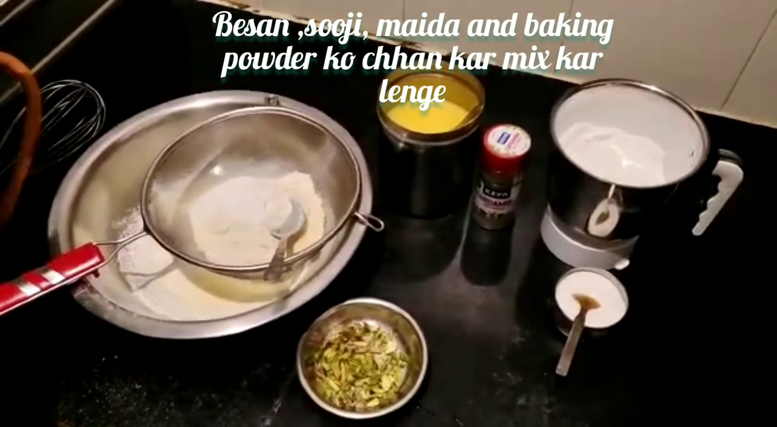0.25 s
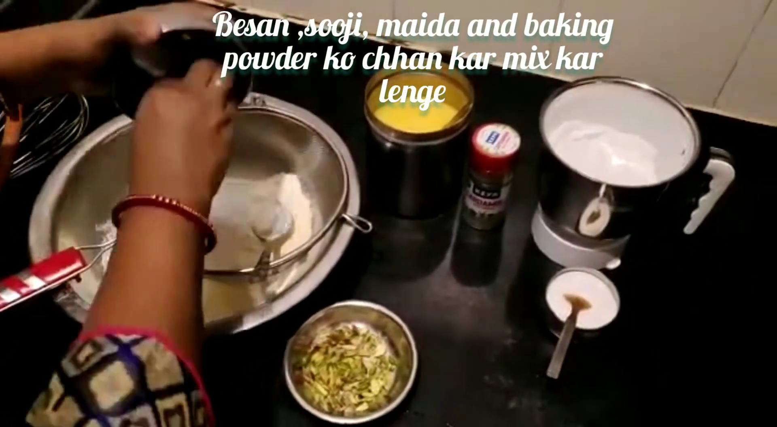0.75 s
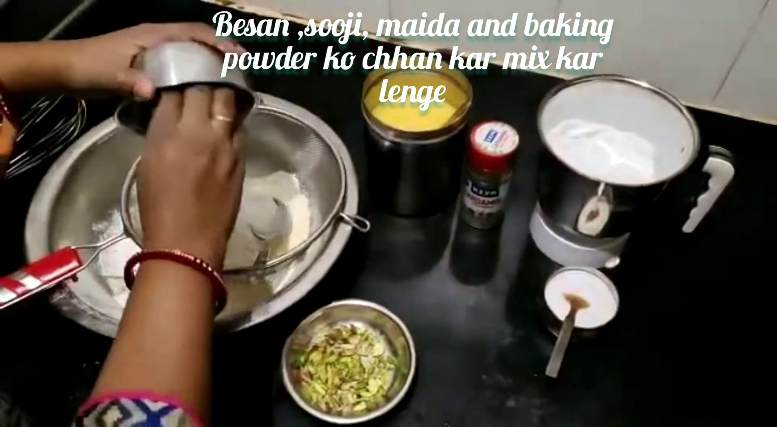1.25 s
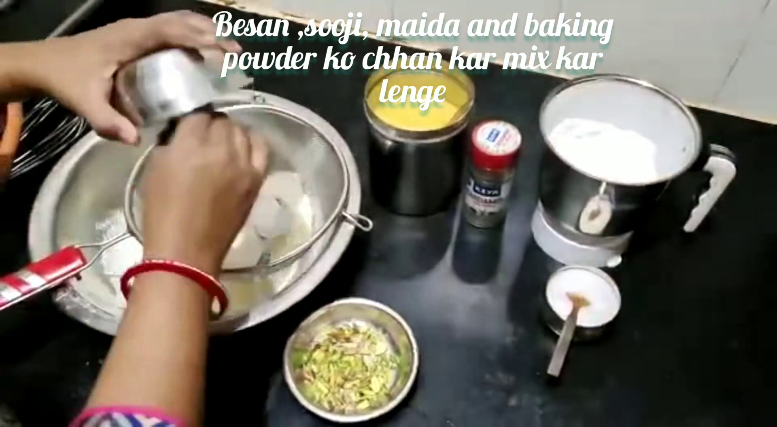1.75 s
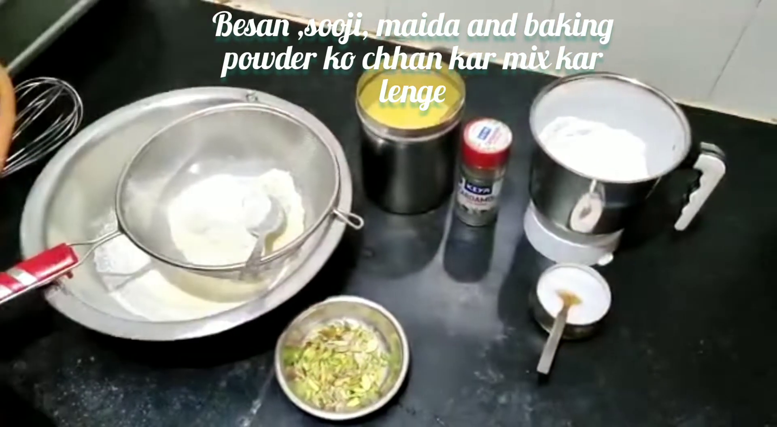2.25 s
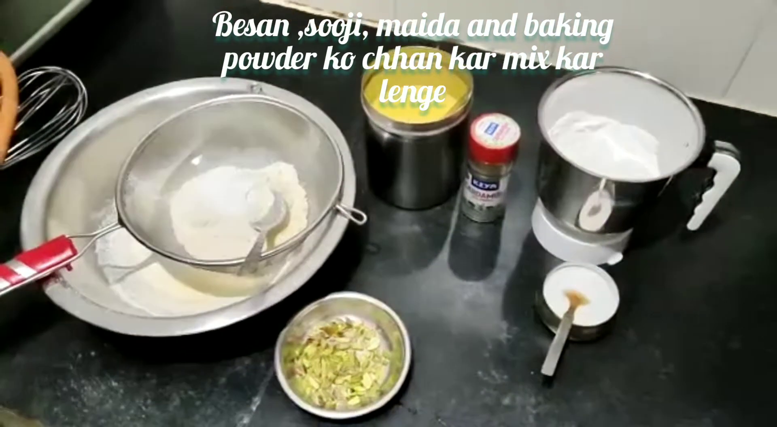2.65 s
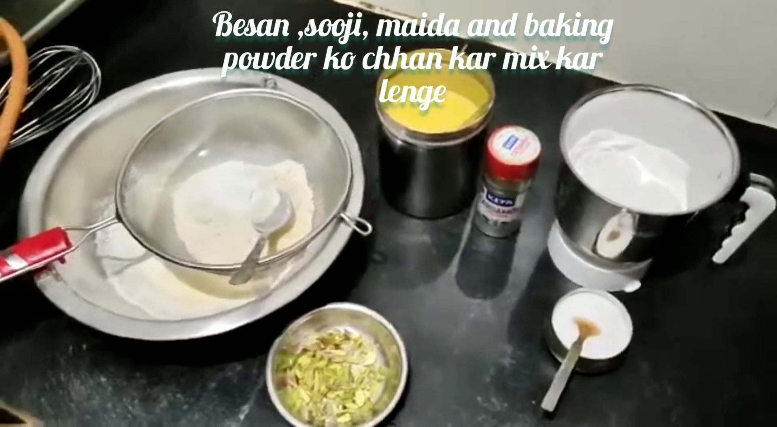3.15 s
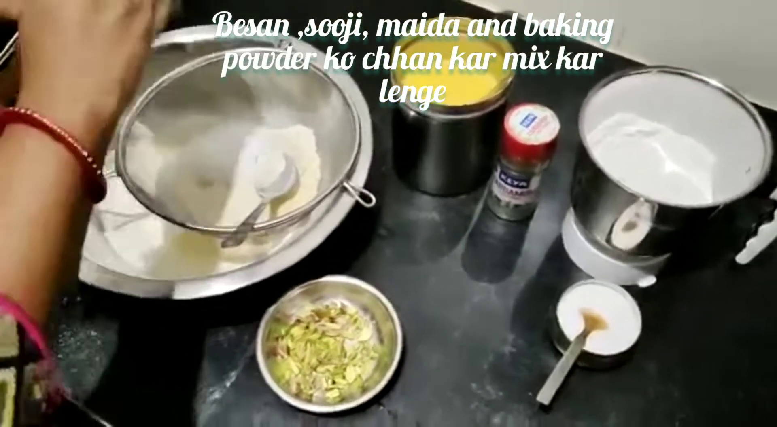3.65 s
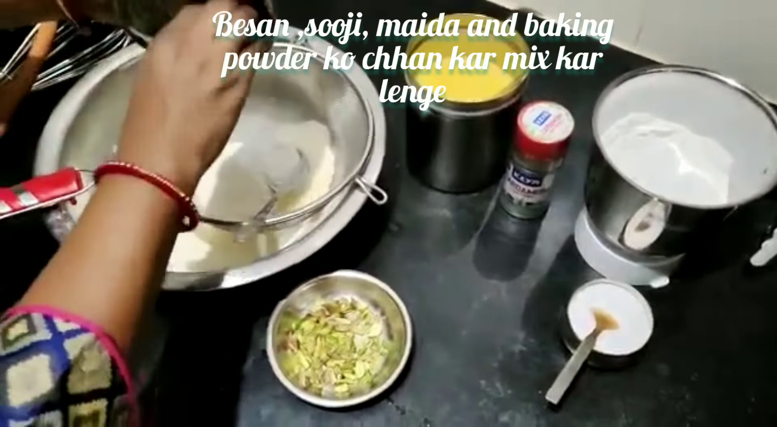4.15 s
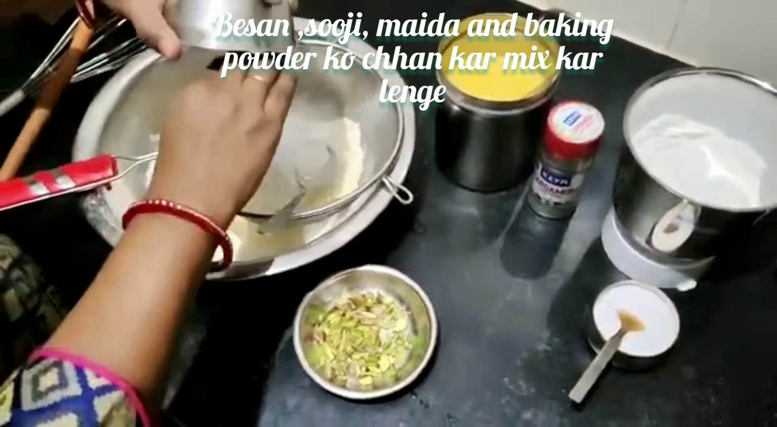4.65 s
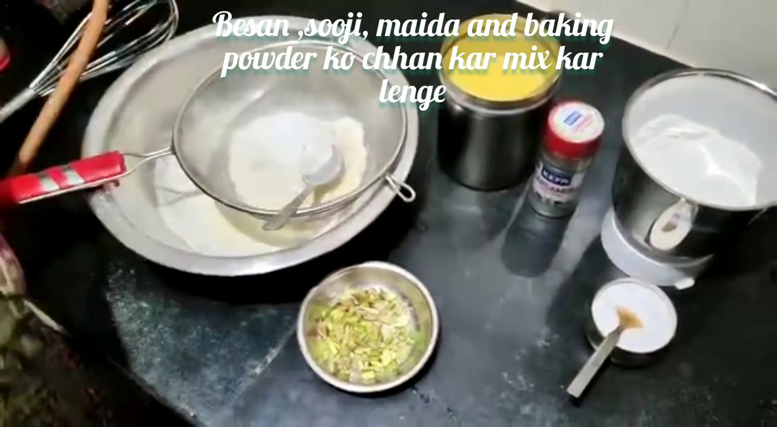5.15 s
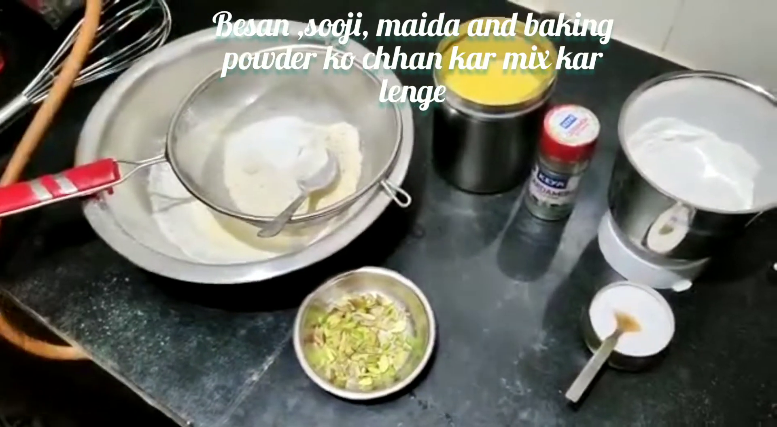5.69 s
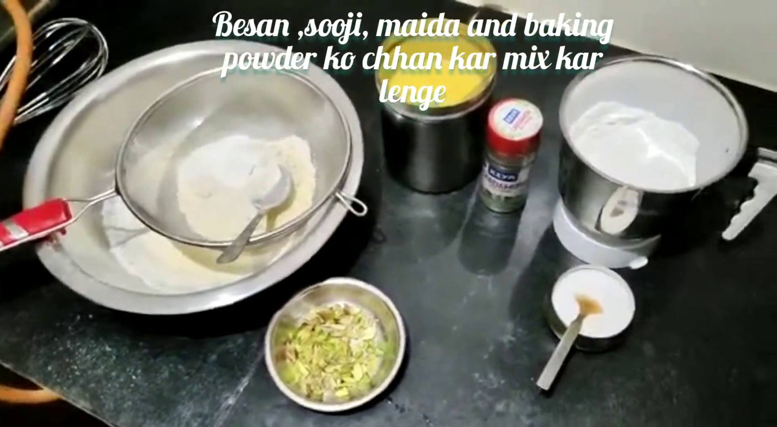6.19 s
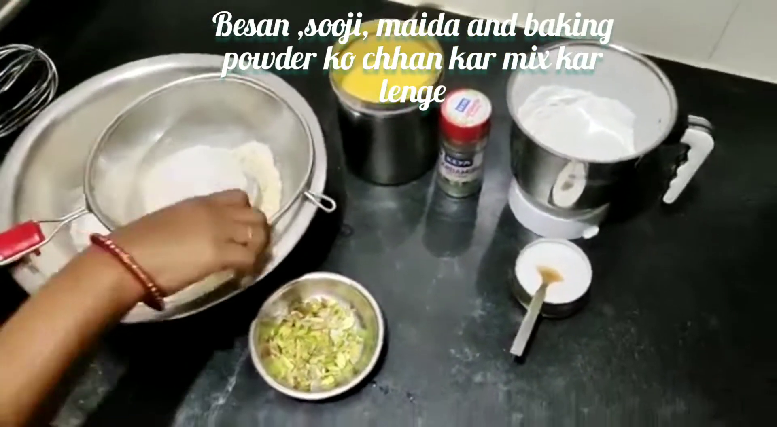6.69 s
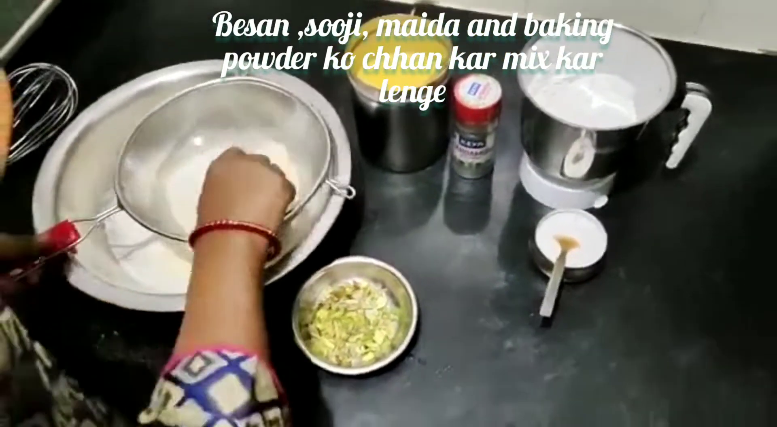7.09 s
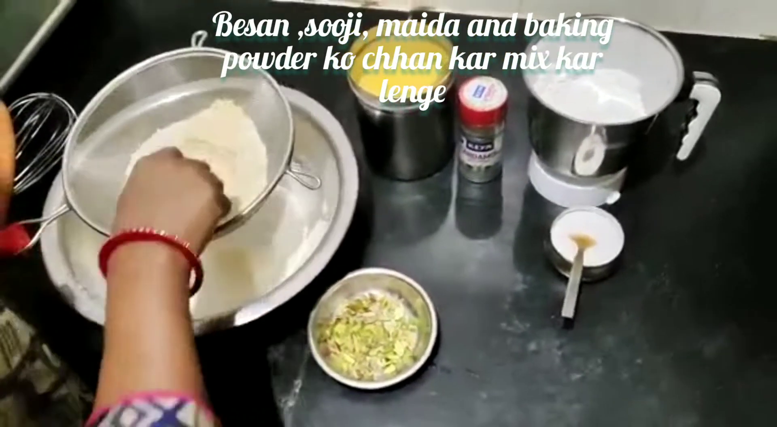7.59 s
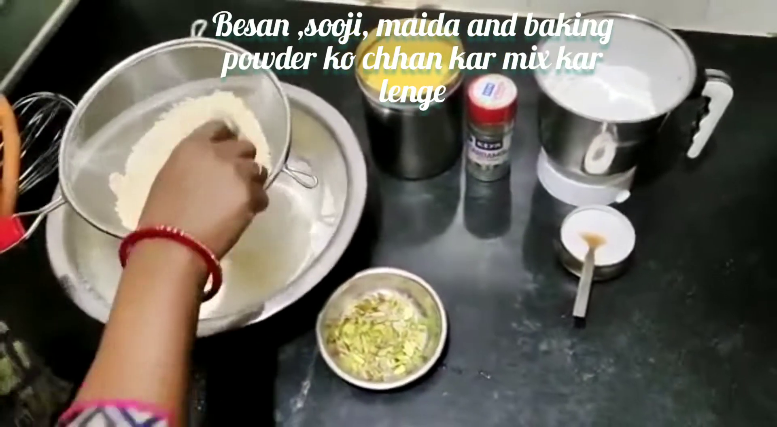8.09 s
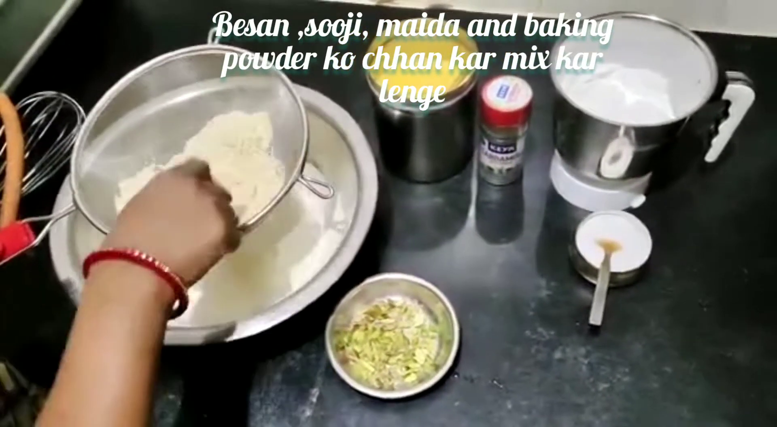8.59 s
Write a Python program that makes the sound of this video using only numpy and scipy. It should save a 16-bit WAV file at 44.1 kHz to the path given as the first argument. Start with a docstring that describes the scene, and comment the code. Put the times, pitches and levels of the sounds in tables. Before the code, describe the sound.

Light metal clinks and scrapes, two ringing clatters of steel cups, then short hissing spoon strokes on wire mesh, with a faint electrical hum.

```python
"""Light steel taps and scrapes over a mains hum: in a kitchen, two small cups are scraped empty over a
sieve and put down with a clatter. Knocks and tiny slips ring the cups' modes, and the hand damps them.
Then a spoon pushes flour through the steel mesh in short strokes that hiss and make the wires sing.
The sound is close, with the stereo image widened in the middle range."""
import sys
import numpy as np
from scipy import signal
from scipy.fft import rfft, irfft, next_fast_len
from scipy.io import wavfile
from scipy.ndimage import uniform_filter1d

SR = 44100
rng = np.random.default_rng(int(sys.argv[2]) if len(sys.argv) > 2 else 0)


def output_pcm(signal):
    """Save a mono or channel-first signal as 16-bit PCM at the path in sys.argv[1].

    Samples are clipped to [-1, 1] before scaling.
    """
    pcm = np.clip(np.atleast_2d(signal).T, -1, 1) * 32767
    wavfile.write(sys.argv[1], SR, np.round(pcm).astype(np.int16))


N = 389403
T = np.arange(N) / SR

# ringing modes of each steel cup: pitch_hz, level_db, t60_s
FIRST_CUP = [(852, -21, 0.29), (1042, -20, 0.81), (1075.4, -1, 0.29), (1202.6, -11.5, 0.18),
             (1612, -3.5, 0.091), (1787, -19, 0.18), (1900, -12, 0.23), (2080, 6.5, 0.24), (2044, -6, 0.51),
             (2434, 2, .2), (4130, -4, 0.11), (5345, -0.5, 0.1), (6460, -3.5, 0.13), (6593, -6.5, 0.14),
             (6940, 0, 0.067), (8680, -16, 0.1), (9330, -22.5, 0.22), (11390, -23, 0.06)]
SECOND_CUP = [(1032, -11, 0.26), (1088, -6, 0.31), (1158, -10.5, 0.42), (1242, 3.5, 0.5), (1323, 3.5, 0.43),
              (1407, -6.5, 0.25), (1705, -17, 0.15), (1750, -11, 0.12), (2190, -9, 0.7), (2261, -1.5, 0.6),
              (2345, 4.5, 0.35), (2262, 4, 0.25), (3620, -9, 0.25), (3910, -10, 0.2), (3990, -5, 0.088),
              (4935, -7, 0.089), (5010, -12.5, 0.16), (5895, -10.5, 0.16), (7340, -9, 0.41)]


def amp(db):
    """Gain of a level in dB."""
    return 10 ** (np.asarray(db) / 20)


def unit_rms(x):
    """Each row at rms 1."""
    return x / np.sqrt(np.mean(x ** 2, -1, keepdims=True) + 1e-20)


def unit_peak(x):
    """Each row at peak 1."""
    return x / abs(x).max(-1, keepdims=True)


def add(mix, start_s, sound):
    """Mixes a sound in at start_s."""
    part = mix[:, round(start_s * SR):][:, :sound.shape[1]]
    part += sound[:, :part.shape[1]]


def colour(x, gain_at):
    """Filters by a gain given as a function of Hz."""
    size = next_fast_len(x.shape[-1])
    return irfft(rfft(x, size) * gain_at(np.fft.rfftfreq(size, 1 / SR)), size)[..., :x.shape[-1]]


def eq(x, curve):
    """Filters by (freq_hz, gain_db) points joined on a log-frequency axis."""
    hz, db = np.transpose(curve)
    return colour(x, lambda f: amp(np.interp(np.log(f + 1), np.log(hz + 1), db)))


def band(x, lo_hz, hi_hz):
    """One steep-sided band of a sound, at rms 1."""
    return unit_rms(colour(x, lambda f: ((1 + (lo_hz / (f + 1)) ** 12) * (1 + (f / hi_hz) ** 12)) ** -.5))


def pan(x, pan_db):
    """Mid signal fed into the side channel moves a source; positive is left."""
    mid, side = x
    lean = np.tanh(pan_db / 12)
    return np.array([mid, np.sqrt(1 - lean ** 2) * side + lean * mid])


def envelopes(rows, gains):
    """Summed strokes, one envelope per column of gains; a rise or fall time spans 20 dB."""
    start, rise, hold, fall = abs(rows[:, :4].T[:, :, None]) + 1e-4
    t = T[::32]
    shape = amp(-20 * (np.maximum(start - t, 0) / rise + np.maximum(t - start - hold, 0) / fall))
    return np.array([np.interp(T, t, level) for level in gains.T @ shape])


def grit(per_s, spread_db):
    """Tiny slips of uneven size, each a noise burst, at the same moments in mid and side."""
    sizes = amp(spread_db * np.minimum(rng.exponential(1, N), 4))
    slips = sizes * (rng.random(N) < per_s / SR)
    bursts = signal.lfilter([1], [1, -np.exp(-1 / (0.0021 * SR))], slips)
    return unit_rms(bursts * rng.standard_normal((2, N)))


def patchy(x, depth_db):
    """The colour drifts in patches some 500 Hz wide and 80 ms long as the contact moves."""
    spectra = signal.stft(x, nperseg=512)[2]
    drift = uniform_filter1d(rng.standard_normal(spectra.shape[1:]), size=6, axis=0)
    drift = uniform_filter1d(drift, size=14, axis=1)
    return signal.istft(spectra * amp(depth_db * drift / drift.std()), nperseg=512)[1][:, :x.shape[1]]


def mains_hum(pitch_hz=100.1, waver_hz=0.39, air_db=-14.5):
    """A wavering hum with its harmonics, and room air that follows the same level."""
    # the hum's level, sinking after the loudest clatter: time_s, level_db
    fader = [(0.0, -26.5), (0.07, -27), (0.59, -27), (2.24, -26), (2.31, -26.5), (4.89, -25.5),
             (4.97, -24.5), (5.09, -24.5), (5.75, -24.5), (5.8, -27.5), (7.21, -29.5), (7.33, -26.5),
             (7.67, -27), (7.77, -30), (7.87, -26.5), (8.51, -28.5), (8.81, -27), (8.83, -23)]
    # overtones against the fundamental: multiple, level_db
    harmonics = [(2, -26.5), (3, -28), (4, -27)]
    # spectrum of the room air: freq_hz, level_db
    air_curve = [(12, -86), (20, -42), (42, -22), (70, -20.5), (103, -5.5), (129, -11), (157, -14.5),
                 (414, -24), (903, -34.5), (1570, -32), (2900, -45), (6870, -44.5), (7900, -51),
                 (11300, -62.5), (15400, -103)]
    waver = np.interp(T, np.arange(46) / 5, rng.standard_normal(46))
    phase = 2 * np.pi * np.cumsum(pitch_hz + waver_hz * waver) / SR
    tone = np.sin(phase) + sum(amp(db) * np.sin(k * phase + 2 * np.pi * rng.random())
                               for k, db in harmonics)
    air = unit_rms(eq(rng.standard_normal((2, N)), air_curve))
    level = amp(np.interp(T, *np.transpose(fader)))
    return level * (np.sqrt(2) * tone * [[1], [-.9]] + amp(air_db) * air * [[1], [1.3]])


def grab_damping(start_s, t, freedom):
    """Extra decay of the low and upper modes once the hand or the counter closes on a ringing cup."""
    # freedom left to ring, smaller is tighter: time_s, low_factor, upper_factor
    grabs = [(2.585, 0.21, 0.13), (2.742, 0.42, 0.12), (2.77, 0.06, 0.15), (3.51, 0.092, .3), (3.64, .1, 1),
             (3.815, .08, 2), (3.9, .1, .2), (4.02, 0.17, 0.46), (5.822, 0.28, .7), (5.897, 0.052, 0.17),
             (6.228, 0.11, 3), (5.953, 0.15, 0.16), (6.065, 0.2, 0.69), (6.27, 0.05, 0.17),
             (6.53, .4, 0.35)]
    free = freedom
    for at_s, *limits in grabs:
        caught = (start_s < at_s) & (start_s + t > at_s)
        free = np.where(caught, np.minimum(free, np.array(limits)[:, None]), free)
    return amp(-60 * np.cumsum(1 / free - 1 / freedom, 1) / SR / 0.51)


def cup_ring(t, low_hz, upper_hz, second_share, freedom, focus_db=36.5, pull=0.46):
    """Low and upper ring of a blow: modes near the two struck pitches speak most."""
    modes = np.array(FIRST_CUP + SECOND_CUP)
    share = np.where(np.arange(len(modes)) < len(FIRST_CUP), 1 - second_share, second_share)
    hz, level_db, t60 = modes.T[:, :, None]
    upper = hz[:, 0] > 2850
    near = np.exp(-(np.log(hz / low_hz) / 0.041) ** 2) + np.exp(-(np.log(hz / upper_hz) / 0.0255) ** 2)
    # the grip pulls nearby modes towards the struck pitches
    hz = hz + pull * np.minimum(near, 1) * (np.where(upper[:, None], upper_hz, low_hz) - hz)
    scatter, phase = rng.random((2, 2, len(modes), 1))
    level_db = level_db + focus_db * near + 2.8 * scatter
    struck = (np.sqrt(share)[:, None] * amp(level_db) * np.exp(2j * np.pi * phase))[..., 0]
    strength = abs(struck[0])
    heard = strength > amp(-45) * np.where(upper, strength[upper].max(), strength[~upper].max())
    age = (t / freedom)[1 * upper]  # the ring ages faster under a firm grip
    rings = np.exp(2j * np.pi * hz * t - np.log(1000) * age / t60)
    return [unit_peak((struck[:, group] @ rings[group]).imag) for group in (heard & ~upper, heard & upper)]


def cup_knocks(bounce_db=-9.5):
    """Each blow cracks, thuds and rings the cups, then chatters in three quick bounces."""
    # blows on the cups: start_s, peak_db, low_hz, upper_hz, upper_db and thud_db (against the low ring),
    # pan_db, second_cup_share, low_t60_factor, upper_t60_factor
    knocks = [(0, -43.5, 2065, 4120, -15, -30, 0, .02, 1.2, 1),
              (.262, -36, 1062, 4120, -18, -32, 13, .03, 0.71, .4),
              (0.216, -34, 1062, 7200, -10, -10, 20, 0.082, 1.2, .46),
              (.3, -30, 2184, 6800, -16, -8, -1, .07, 0.42, .44),
              (.325, -32.5, 2150, 4060, -18, -30, 3, .02, 0.7, .8),
              (.36, -29, 2080, 5360, -4, -30, 8, 0.022, 0.38, .5),
              (0.759, -27.5, 1043, 6260, 10, -30, 6, .02, 0.74, 0.76),
              (.388, -28, 1065, 6750, 6, -20, 14, .07, 0.4, 0.58),
              (.472, -38, 2280, 3570, -13, -3, 3, .5, 0.19, .4),
              (.799, -32, 2058, 7310, -10, -30, -2, .05, 0.44, .34),
              (0.915, -29.5, 1120, 6740, -10, -35, 8, 0.039, 0.26, .25),
              (.946, -28, 1103, 4190, -8, -34, 5, 0.06, 0.31, .31),
              (1.101, -20.5, 1192, 4260, -4.5, -42, 3, 0.092, 0.26, 0.31),
              (1.123, -32, 2165, 5310, -17, -40, 3, .04, 0.3, .3),
              (1.263, -25, 1078, 4020, -32, -23, 16, 0.032, 0.32, .25),
              (1.338, -31.5, 1130, 4100, 3, -35, 0, 0.034, 0.55, 0.32),
              (1.534, -31, 2106, 5320, -4, -34, 3, .03, 0.36, .2),
              (1.4, -44.5, 2410, 4120, -20, -20, -5, .03, 0.89, .3),
              (1.638, -43, 2480, 7050, -18, -4, -2, .03, .5, .18),
              (1.685, -39, 2500, 4120, -18, -20, 0, .03, .6, .3),
              (1.741, -32.5, 1110, 5080, -18, 0, 0, 0.085, 0.51, 0.14),
              (1.843, -20.5, 1350, 5360, -11, 2.5, 2, 0.35, 0.31, 0.43),
              (2.439, -25.5, 2296, 6450, -8, -3, 2, 0.33, 0.32, 0.43),
              (2.462, -17.5, 1620, 4120, -13, -21, 6, 0.91, 0.98, 0.49),
              (2.521, -4, 1715, 6290, -23.5, -36, 7, 0.66, 0.12, 0.79),
              (2.545, -13, 1712, 4062, -10, -11.5, 7, 0.5, .62, 0.55),
              (2.556, -15.5, 2290, 6300, -3, -30, -1, .7, 0.75, 0.46),
              (2.572, -16, 1980, 4050, -7, -25, -5, .3, 0.23, .4),
              (2.628, -8.5, 1420, 9400, -28, -44, 6, 0.64, 0.071, 0.94),
              (2.633, -22, 1650, 11540, -9, -40, 0, .01, 1.6, 1.3),
              (2.633, -15, 2076, 4160, -20, -39, 6, 0.013, 2.5, 1.7),
              (2.654, -17, 2074, 6720, -1.5, -38, 0, .005, 2.8, 3.3),
              (2.675, -20, 2070, 4040, -11, -38, 0, .01, 2.3, 2.8),
              (2.68, -19.5, 2062, 5390, -15, -34, -8, .01, 1.1, 1.7),
              (2.7, -20, 1370, 6900, -4, -30, -2, .3, .5, 1.2),
              (2.588, -27, 2310, 4030, -4, -30, 2, .8, 0.31, 0.73),
              (2.785, -36, 2086, 4100, -8, -30, -3, .01, .5, 0.53),
              (2.72, -25, 2050, 4141, -7, -36, 12, .01, 1.3, 1.2),
              (2.821, -32.5, 1954, 5070, 3, -28, -1, 0.031, .16, 0.52),
              (3.46, -33.5, 1108, 4650, -6, -21, 11, 0.67, 1.3, 0.7),
              (3.609, -35.5, 2200, 4130, -2, -28, 5, .8, 0.4, 1.4),
              (3.655, -38.5, 1120, 5850, -5, -30, 2, 0.89, 0.47, 0.91),
              (3.79, -27, 1155, 5660, -4, -32, 10, 0.91, 0.34, 0.73),
              (3.99, -29, 2174, 7350, 9, -30, -1, .9, 0.35, 0.07),
              (3.575, -27, 1130, 5900, -21, -30, 13, 0.33, 1, 0.71),
              (3.719, -35.5, 1114, 6890, -20, -24, 5, 0.76, 0.62, .7),
              (3.776, -28, 2267, 5040, -15, -37, 9, 0.54, 0.18, 0.35),
              (3.787, -33, 2250, 5045, 2, -37, 11, 0.99, 0.3, 2.3),
              (3.84, -38.5, 2280, 5770, -12, -37, 10, .9, 0.81, 1),
              (3.558, -34, 2280, 7340, -15, -30, 3, .9, 0.33, 0.44),
              (3.968, -27, 1140, 3700, -4, -27, 15, 0.99, 0.27, 0.12),
              (3.984, -18.5, 1295, 5110, -3, -24, 11, 0.8, 0.12, 0.25),
              (3.994, -24, 1170, 5140, 1, -20, 8, 1, 0.18, 0.49),
              (4.22, -28, 1175, 5010, -10, -16, 12, 0.44, 0.34, 2),
              (4.246, -35, 2078, 6420, 5, -23, -3, .02, 2.1, 0.9),
              (4.525, -26, 1170, 5100, -17, -20, 8, 0.77, 0.37, 0.67),
              (4.984, -33.5, 1275, 6800, -25, -20, -8, .55, 0.43, .51),
              (5.091, -35.5, 1620, 3670, -15, -4, -5, 0.45, 0.64, .51),
              (5.306, -38, 1590, 5170, -3, -7, -3, 0.59, 0.37, 0.47),
              (5.525, -39.5, 1610, 3910, -3, -9, 7, 0.49, 0.5, 0.51),
              (5.772, -4, 2464, 3670, -0.5, -52, 9, 1, 0.79, 0.39),
              (5.776, -7.5, 1264, 4860, 2, -41, 1, 0.78, 0.24, 0.46),
              (5.816, -11, 1303, 4030, -1.5, -50.5, 4, .99, 0.6, .8),
              (5.796, -6.5, 1078, 5100, -16, -44, -6, 0.89, 0.69, 0.96),
              (5.89, -3.5, 1274, 5470, -20, -42, 5, 0.74, 0.14, .38),
              (5.905, -11, 1288, 4040, -28, -44, -11, 0.91, 0.46, .38),
              (5.861, -14.5, 2320, 5000, -25, -40, -4, .99, 0.23, .4),
              (5.919, -11, 2293, 5500, -27, -32, -3, .9, 0.33, .4),
              (5.7725, -10.5, 2790, 5750, 7, -44, 6, .99, .1, 0.17),
              (5.788, -9, 2276, 3720, -1, -42, 2, 0.82, .5, .5),
              (5.778, -25, 1110, 7390, 7, -45, 1, .99, 0.28, 0.54),
              (5.998, -20, 2300, 6900, 9, -43, -1, .3, .2, 0.22),
              (6.401, -27, 2120, 4140, 0, -40, 2, .02, .4, 1.94),
              (6.002, -29, 1710, 5370, -10, -20, 1, .6, .85, .4),
              (6.046, -11, 2297, 4100, -13, -28, 3, 1, 0.42, 1.2),
              (6.035, -10, 1717, 3940, -17.5, -32, 6, .9, .9, 0.9),
              (6.012, -21, 1720, 6100, -13, -23, 12, 0.55, .98, .4),
              (6.212, -15, 1043, 4070, -24, -35, -5, 0.022, 0.33, 1.9),
              (6.186, -19.5, 1816, 4980, -8, -50, 8, 0.032, 0.6, .2),
              (6.232, -21.5, 1091, 4090, -16, -40, 3, .02, 1.1, 3),
              (6.195, -10.5, 1067, 4076, -18, -32, 6, .018, 0.49, 3.6),
              (6.287, -17, 865, 5050, -26, -24, 1, 0.046, 0.64, .3),
              (6.348, -14.5, 1103, 5070, -2, -17, 2, .3, 0.49, 0.1),
              (6.371, -16, 1910, 3225, -14, -22, 7, .05, 0.68, 0.27),
              (6.285, -14.5, 1071, 5080, -14, -6, 6, 0.23, 0.94, .15),
              (6.305, -18, 1064, 5000, -20, -12, 2, .1, 0.75, .5),
              (6.327, -13.5, 2284, 4930, -15, -1.5, 3, .46, 0.25, .6),
              (6.368, -12, 1051, 4130, -11, -4, 0, 0.26, 0.27, 1.2),
              (6.395, -26.5, 1038, 5366, -8.5, -11, 7, .035, 0.27, 3.5),
              (6.549, -34, 1593, 5030, -6, -30, 1, 0.16, 1.7, 1.1),
              (6.737, -33, 1640, 7120, 12, -10, 0, .18, 0.44, 0.36)]
    t = np.arange(SR // 5) / SR
    onset = np.minimum(t / .0006, 1)
    out = np.zeros((2, N))
    for start_s, peak_db, low_hz, upper_hz, upper_db, thud_db, pan_db, share, *t60_factors in knocks:
        freedom = np.outer(t60_factors, np.ones_like(t))
        low, high = cup_ring(t, low_hz, upper_hz, share, freedom)
        swell = np.minimum(t * low_hz / 2.5, 1)  # the low ring builds over 2.5 cycles
        noise = rng.standard_normal((2, len(t)))
        crack = band(noise, 2500, 18000) * np.exp(-t / 0.00084)
        crack_db = -22.5 + 0.29 * (peak_db + 11)  # harder blows crack more
        thud = band(noise, 570, 1320) * np.exp(-t / 0.025) * np.minimum(t / 0.027, 1)
        blow = np.array([low * swell + amp(thud_db) * thud, amp(upper_db) * high + amp(crack_db) * crack])
        chatter = blow.copy()
        for late_s, sign in zip(rng.uniform(.005, .035, 3), (1, -1, 1)):
            lag = round(late_s * SR)
            chatter[..., lag:] += sign * amp(bounce_db) * blow[..., :-lag]
        damped = (chatter * grab_damping(start_s, t, freedom)[:, None]).sum(0)
        add(out, start_s, pan(amp(peak_db) * onset * unit_peak(damped), pan_db))
    return out


def cup_scrapes(wander_db=4.5):
    """Slips rasp and ring the hand-damped cups; the contact wanders, so modes come and go."""
    # scrapes and rattles: start_s, rise_s, hold_s, fall_s, low_db, middle_db, upper_db, fizz_db,
    # second_cup_share, rasp_offset_db
    scrapes = np.array([(0.292, 0.083, 0.029, 0.036, -43, -48, -40, -42.5, 0.16, -5.5),
                        (0.349, .02, .055, 0.043, -58, -46, -40, -39, .1, -4.5),
                        (0.481, 0.026, .004, 0.017, -30.5, -34.5, -55, -72, 0.6, -9),
                        (0.505, 0.004, 0.03, 0.076, -40.5, -48, -46, -46, 0.15, -7.5),
                        (0.569, .02, 0.027, 0.051, -49, -43, -45.5, -43, .15, -6),
                        (0.655, .004, .015, 0.059, -45, -52, -49, -48, .15, -8),
                        (0.74, 0.02, 0.088, 0.034, -39, -49, -37.5, -39.5, 0, -4),
                        (0.964, 0.06, .005, 0.071, -49, -47, -42.5, -43.5, 0, -4),
                        (1.096, 0.0033, .004, 0.17, -46, -42, -40, -49, 0, -8),
                        (1.285, 0.0075, 0.0044, 0.012, -41, -70, -46, -73, 0.1, -21),
                        (1.331, 0.013, 0.0036, 0.064, -57, -58, -38.5, -40.5, 0, -4.5),
                        (1.41, 0.066, 0.11, 0.17, -50, -51, -54.5, -65, 0, -8),
                        (1.536, 0.02, .004, 0.18, -48, -43.5, -33, -38, 0.6, -5),
                        (1.657, 0.026, 0.028, 0.19, -77, -55.5, -57, -70, 0.8, 0.5),
                        (1.778, 0.048, .06, 0.067, -44, -44.5, -55, -61, 0, -4.5),
                        (1.847, 0.0047, 0.019, 0.06, -41, -27, -54, -44.5, 0.55, -3),
                        (1.905, 0.032, 0.0045, 0.048, -53, -55, -42, -44.5, 0.84, -8),
                        (1.978, 0.045, 0.0035, 0.13, -39, -39, -51, -66, 0.3, -7),
                        (2.463, 0.0098, 0.0044, 0.088, -62, -23.5, -29, -48, 0.8, -2.5),
                        (2.519, 0.001, 0.02, 0.078, -57, -10.5, -27.5, -27.5, 0.86, -11.5),
                        (2.628, .001, 0.077, 0.054, -19.5, -22, -43, -44, 0, -15.5),
                        (2.762, 0.063, .004, 0.083, -42, -51, -48, -69, 0.1, -14),
                        (2.877, 0.22, .004, 0.034, -39.5, -54, -50.5, -56, 0.01, -8.5),
                        (3.144, 0.083, 0.093, 0.14, -47.5, -61, -59, -61, 0.2, -11),
                        (3.466, 0.012, .004, 0.034, -55, -67, -53, -45, 0.82, -5),
                        (3.557, 0.091, 0.078, 0.05, -56, -48.5, -46, -47.5, 0.54, -2),
                        (3.792, 0.086, .004, 0.06, -46, -44, -45, -44.5, 1, -1.5),
                        (3.991, 0.056, 0.0043, 0.019, -54, -29.5, -29.5, -37.5, 0.75, -7),
                        (4.176, 0.082, 0.083, 0.097, -46.5, -46.5, -45, -46, 0.5, -6.5),
                        (4.443, 0.1, .004, 0.049, -48, -57, -47.5, -46, .6, -5.5),
                        (4.539, 0.015, .004, 0.085, -47, -43, -40, -44.5, 0.7, -5.5),
                        (4.618, 0.053, 0.025, 0.017, -35.5, -45, -56, -46.5, 0.8, -7.5),
                        (4.791, 0.026, .004, 0.058, -45, -64, -59, -49, 1, -6.5),
                        (5.008, 0.045, 0.033, 0.097, -51, -58, -60.5, -71, 0.3, 5),
                        (5.094, 0.015, .004, 0.027, -55, -50, -40.5, -49, 0.6, -2),
                        (5.33, .04, 0.02, 0.027, -46, -33.5, -59, -77, 0, -30),
                        (5.515, 0.026, .004, 0.14, -66, -58, -51, -77, 0.3, -10),
                        (5.752, 0.014, 0.03, .01, -26.5, -31, -36, -50, 0.7, -6.5),
                        (5.771, 0.0005, 0.023, 0.062, -16, -24.5, -18, -31.5, 0.98, 0.5),
                        (5.847, 0.072, 0.018, 0.012, -25, -36, -33, -62, 0.6, 1.5),
                        (5.902, 0.021, 0.031, 0.057, -18, -29, -28, -49, 0.64, -0.5),
                        (6, 0.012, 0.0035, 0.081, -34, -51, -23.5, -40, 0, -2.5),
                        (6.028, 0.033, 0.015, 0.15, -26, -14.5, -32, -42, 0.96, -9.5),
                        (6.187, 0.003, 0.017, 0.12, -53, -39.5, -44.5, -95, 0.4, 9),
                        (6.29, 0.0097, 0.0044, 0.026, -8.5, -22, -36, -58, 0.4, -22.5),
                        (6.326, 0.023, 0.036, 0.022, -32, -32, -35.5, -43, 1, -10),
                        (6.366, 0.0018, 0.0075, 0.055, -19.5, -18, -25.5, -37.5, 0.93, 0),
                        (6.497, .03, .004, .03, -62, -52, -62, -85, 0.1, -22),
                        (6.549, .02, 0.005, 0.18, -46, -36.5, -56, -89, 0, -10.5),
                        (6.733, 0.013, 0.0036, 0.21, -63, -45.5, -47.5, -60, 0.1, -12)])
    # spectrum of the dry rasp: freq_hz, level_db
    rasp_curve = [(240, -66), (400, -34), (845, -40), (1080, -17), (1760, -23.5), (2320, -3.5),
                  (2540, -8.5), (3660, -4.5), (4540, -4.5), (7170, -12), (7860, -16), (11500, -27),
                  (15400, -32)]
    # low, middle, upper and fizz bands: lo_hz, hi_hz, ring_trim_db, rasp_trim_db
    bands = [(600, 1200, -10.5, -1.5), (1470, 1800, -8.5, 0), (2550, 7000, -6.5, -4), (7600, 15600, -5, 3)]
    peaks, share = amp(scrapes[:, 4:8]), scrapes[:, 8:9]
    first_levels = envelopes(scrapes, peaks * np.sqrt(1 - share))
    second_levels = envelopes(scrapes, peaks * np.sqrt(share))
    rasp_levels = envelopes(scrapes, peaks * amp(scrapes[:, -1:]))
    rasp = patchy(eq(grit(per_s=3200, spread_db=1.8), rasp_curve), depth_db=3)
    catches = grit(per_s=500, spread_db=1.9)  # only the few larger catches ring the steel
    out = np.zeros((2, N))
    for k, (lo_hz, hi_hz, ring_db, rasp_db) in enumerate(bands):
        out += amp(rasp_db) * rasp_levels[k] * band(rasp, lo_hz, hi_hz)
        for cup, level in ((FIRST_CUP, first_levels[k]), (SECOND_CUP, second_levels[k])):
            modes = np.reshape([mode for mode in cup if lo_hz < mode[0] <= hi_hz], (-1, 3))
            for hz, db, t60 in modes:
                held_t60 = .8 * t60 * (1000 / hz) ** .3  # fingers damp high modes most
                radius, angle = amp(-60 / (SR * held_t60)), 2 * np.pi * hz / SR
                drift = np.clip(rng.standard_normal(140), -1.5, 1.5)
                wander = np.interp(T, np.arange(140) / 15, amp(wander_db * drift))
                drive = catches * level * wander * np.sqrt(2 * (1 - radius ** 2)) * np.sin(angle)
                gain = amp(db + ring_db) / np.linalg.norm(amp(modes[:, 1]))
                out += gain * signal.lfilter([1], [1, -2 * radius * np.cos(angle), radius ** 2], drive)
    return out


def mesh_song(slips, hiss_level, width_hz=400):
    """The taut mesh sings almost evenly under firm strokes and drops out under the lightest."""
    # the note shifts with the place of the spoon: time_s, pitch_hz
    glide = [(7.05, 5090), (7.078, 5000), (8.69, 5120), (8.764, 4600), (8.83, 4600)]
    pitch_hz = np.interp(T[-len(hiss_level):], *np.transpose(glide))
    carrier = np.exp(2j * np.pi * np.cumsum(pitch_hz) / SR)
    radius = np.exp(-np.pi * width_hz / SR)
    song = (carrier * signal.lfilter([1], [1, -2 * radius, radius ** 2], slips / carrier)).real
    hiss_db = 20 * np.log10(hiss_level + 1e-9)
    return amp(0.69 * hiss_db - 21.5 - 1.5 * np.maximum(-42 - hiss_db, 0)) * unit_rms(song)


def sieve(ring_db=3.5):
    """The spoon drags over the wires: dense slips hiss, ring the mesh and shake the rim."""
    # spoon strokes: start_s, rise_s, hold_s, fall_s, hiss_db, upper_body_db, lower_body_db, thump_db
    strokes = np.array([(7.047, 0.0046, 0.018, 0.044, -46.5, -56, -49, -54),
                        (7.095, 0.034, 0.027, 0.12, -33.5, -32, -39.5, -39),
                        (7.216, 0.028, 0.011, 0.039, -60, -49.5, -62, -32.5),
                        (7.335, 0.0045, 0.025, 0.03, -53.5, -55, -62, -41),
                        (7.391, 0.018, 0.063, 0.032, -35.5, -35.5, -42.5, -44.5),
                        (7.506, 0.025, 0.066, 0.04, -44, -52, -42.5, -42),
                        (7.631, 0.0046, 0.017, 0.04, -35.5, -48, -54, -55),
                        (7.661, 0.042, 0.037, 0.028, -36, -35, -36.5, -44),
                        (7.789, 0.084, 0.0045, 0.058, -34.5, -43, -35, -47),
                        (7.912, 0.041, 0.026, 0.06, -30, -33.5, -36, -44),
                        (7.996, 0.046, 0.011, 0.025, -52, -70, -65, -48),
                        (8.162, 0.0041, 0.021, 0.036, -36.5, -47, -52, -57),
                        (8.216, 0.024, 0.072, 0.039, -30, -33.5, -31, -47),
                        (8.34, .02, 0.0069, 0.22, -66, -60, -61, -54),
                        (8.456, 0.0012, 0.0066, 0.045, -38, -53, -53, -58),
                        (8.495, 0.037, 0.023, .04, -36, -49, -37.5, -50),
                        (8.541, 0.031, 0.049, 0.027, -29.5, -36.5, -34, -46),
                        (8.64, 0.05, .05, 0.089, -64, -61, -56, -56),
                        (8.773, 0.0026, 0.015, 0.049, -36, -53, -42, -56),
                        (8.805, 0.039, .03, .05, -33, -37.5, -37.5, -47)])
    # spectrum of the scraped mesh: freq_hz, level_db
    mesh_curve = [(150, 1), (250, 5.5), (347, 4.5), (865, -3), (993, 0), (1940, -0.5), (2300, -6.5),
                  (2800, -11), (4100, -12.5), (5110, -7), (7090, -5), (7860, -7.5), (10700, -19),
                  (12100, -28.5), (13200, -60), (14400, -29), (15400, -41)]
    # resonances of mesh and rim: pitch_hz, width_hz, level_db
    wires = [(1286, 57, -4.5), (1660, 92, -11.5), (1935, 18, 3), (2610, 120, -5), (4666, 56, 3.5),
             (5006, 120, 4), (5200, 110, -2), (5770, 79, 2.5), (6740, 220, -12), (7060, 45, 1)]
    # the spoon's edge ticks on the mesh: start_s, peak_db
    ticks = [(7.628, -38), (8.164, -27), (8.412, -24.5), (8.455, -33), (8.7294, -29.5), (8.773, -40)]
    span = 2 * SR  # the sifting fills the last two seconds
    hiss, upper, lower, thump = envelopes(strokes, amp(strokes[:, 4:]))[:, -span:]
    flour, grains = grit(per_s=4400, spread_db=0.29), grit(per_s=600, spread_db=2.8)
    slips = unit_rms(flour + amp(-6) * grains)[:, -span:]
    resonance = lambda f: sum(amp(db) / (1 + (2 * (f - hz) / width) ** 2) for hz, width, db in wires)
    scrape = eq(patchy(slips, depth_db=2.5), mesh_curve)
    scrape = colour(scrape, lambda f: 1 + amp(ring_db) * resonance(f))
    out = hiss * band(scrape, 4080, 17000) + thump * band(scrape, 146, 810)
    out += upper * band(scrape, 2050, 3990) + lower * band(scrape, 836, 1630)
    out += mesh_song(slips, hiss)
    out = np.pad(out, ((0, 0), (N - span, 0)))
    t = np.arange(SR // 20) / SR
    for start_s, peak_db in ticks:
        tick = unit_rms(eq(rng.standard_normal((2, len(t))), mesh_curve)) * np.exp(-t / 0.0036)
        add(out, start_s, amp(peak_db) * tick / abs(tick[0]).max())
    return pan(out, pan_db=1.5)


def kitchen_walls(x, t60_s=0.19):
    """Sparse reflections of random sign from tiled walls, separate for mid and side."""
    taps = np.zeros((2, SR // 3))
    slots = np.arange(200, SR // 3 - 20, 20)
    delays = slots + rng.integers(0, 20, (2, len(slots)))
    echoes = rng.choice([-1., 1.], delays.shape) * amp(-60 * delays / SR / t60_s)
    np.put_along_axis(taps, delays, echoes, 1)
    return signal.oaconvolve(x, taps / np.linalg.norm(taps[0]), axes=1)[:, :N]


def scene():
    """Cups, sieve, room and hum, mixed in mid and side and turned into left and right."""
    # stereo width: freq_hz, side_gain_db
    width = [(60, -26), (110, -19), (200, -16), (380, -4), (700, 2), (1290, 4), (2370, 0.5), (4380, 0),
             (8090, 0), (14900, 0)]
    steel = cup_scrapes() + sieve() + cup_knocks()
    mid, side = steel + amp(-15) * kitchen_walls(steel) + mains_hum()
    side = eq(side, width)
    return np.array([mid + side, mid - side])


def record(dry):
    """The microphone dips the treble, peaks clip at full scale, and the top is cut at 15.7 kHz."""
    # microphone response: freq_hz, gain_db
    microphone = [(7250, -1.95), (7800, -9.5), (8300, -8), (11800, 2), (12800, -29), (13400, -19),
                  (14500, -8), (15400, -15)]
    clipped = np.clip(eq(dry, microphone), -1, 1)
    lowpass = signal.firwin(511, 15700, window=("kaiser", 9), fs=SR)
    return signal.oaconvolve(clipped, lowpass[None], "same")


dry = scene()
out = record(dry)
output_pcm(out)
```